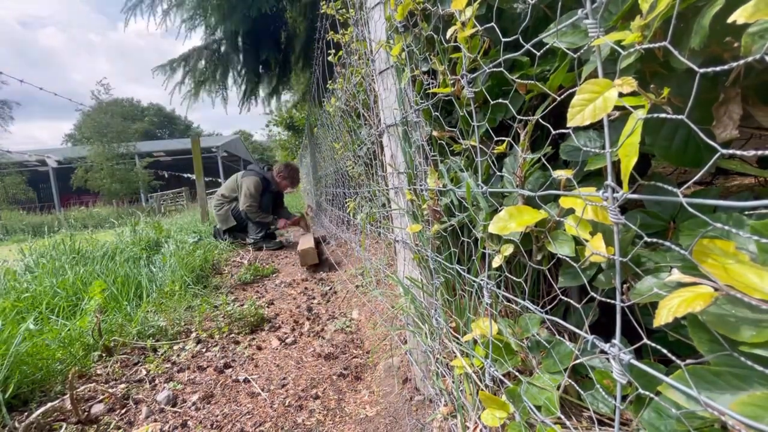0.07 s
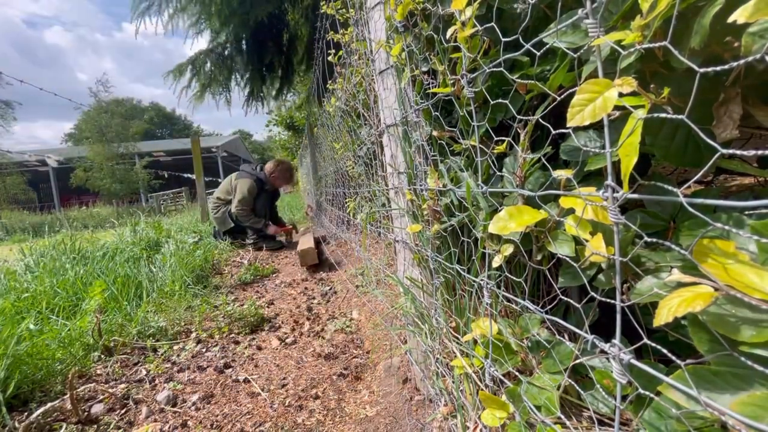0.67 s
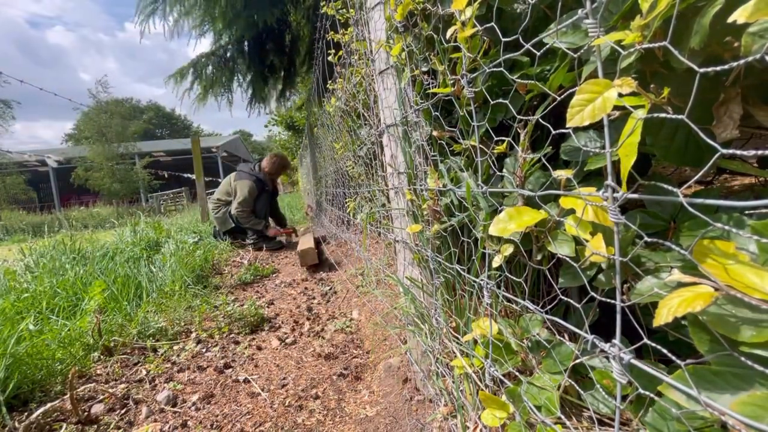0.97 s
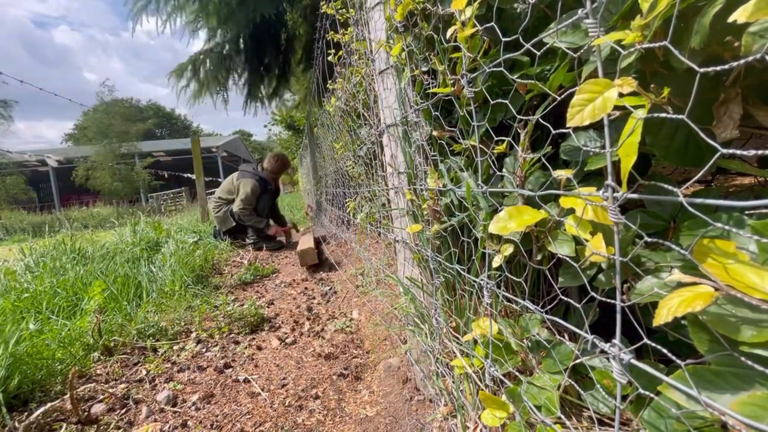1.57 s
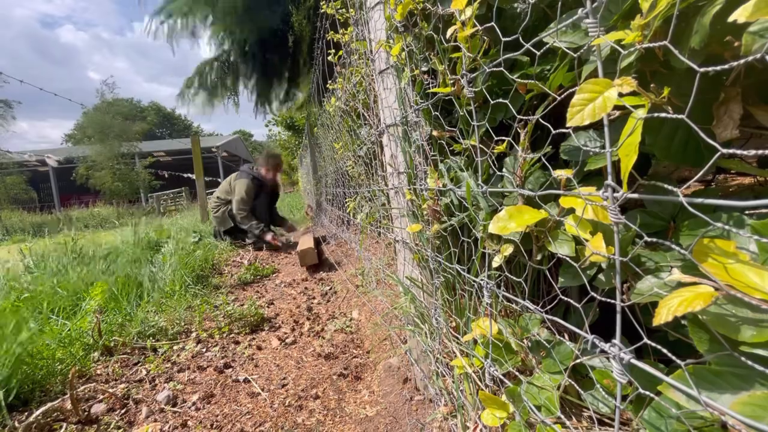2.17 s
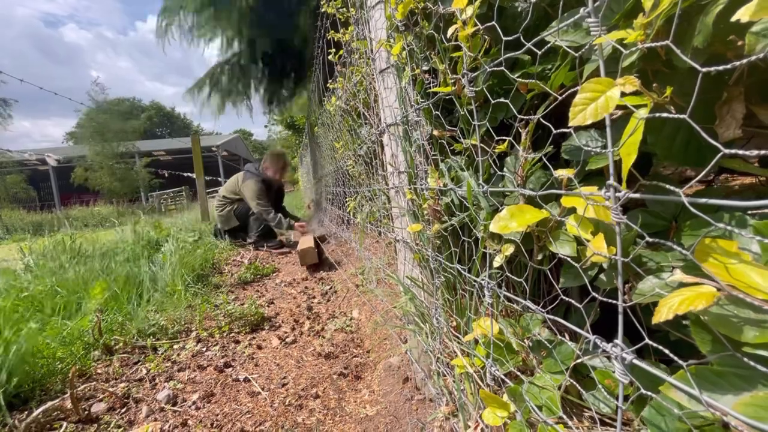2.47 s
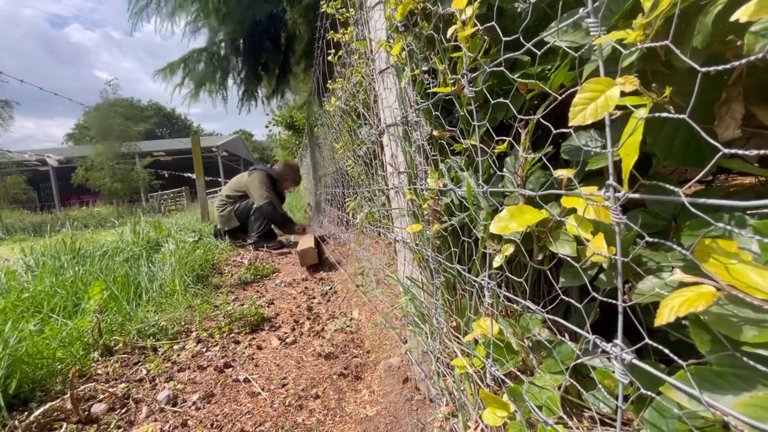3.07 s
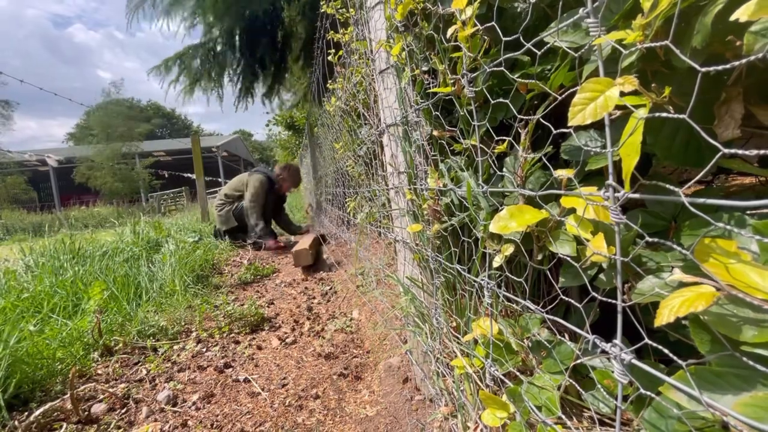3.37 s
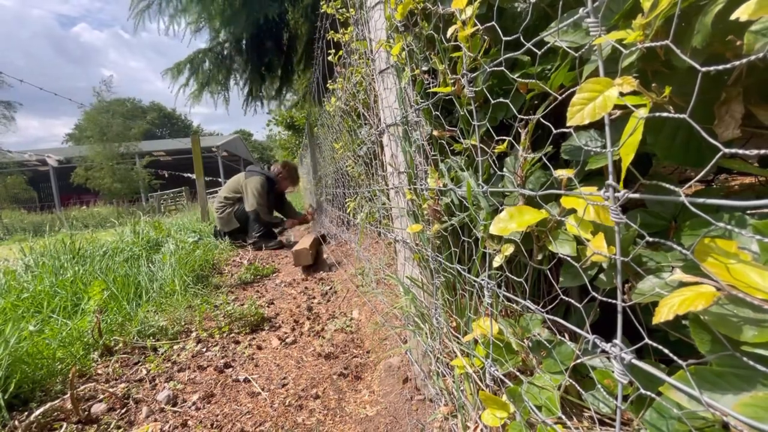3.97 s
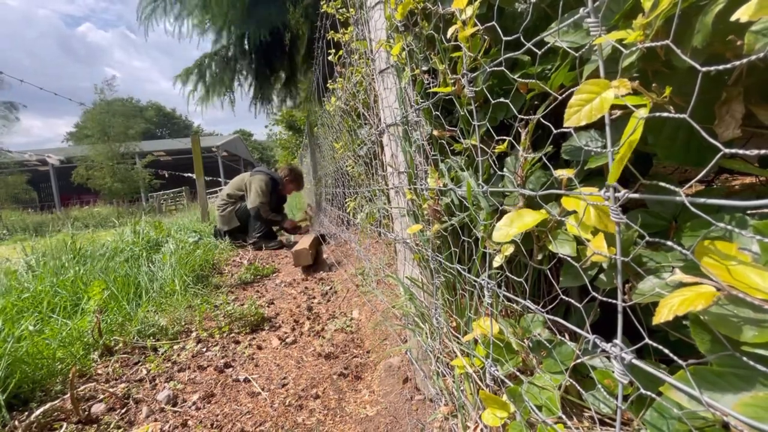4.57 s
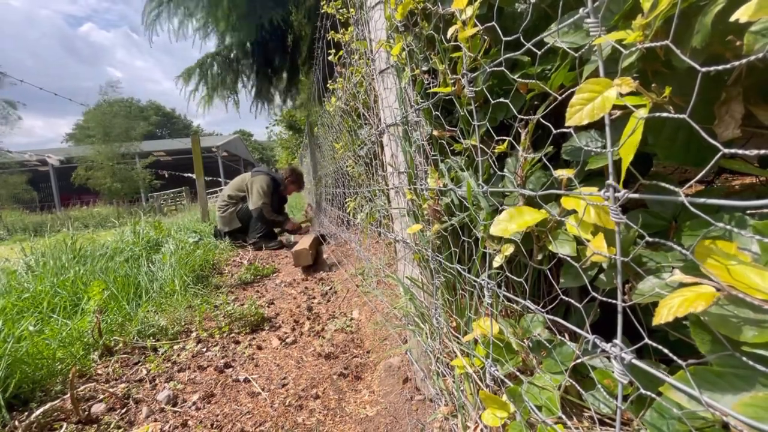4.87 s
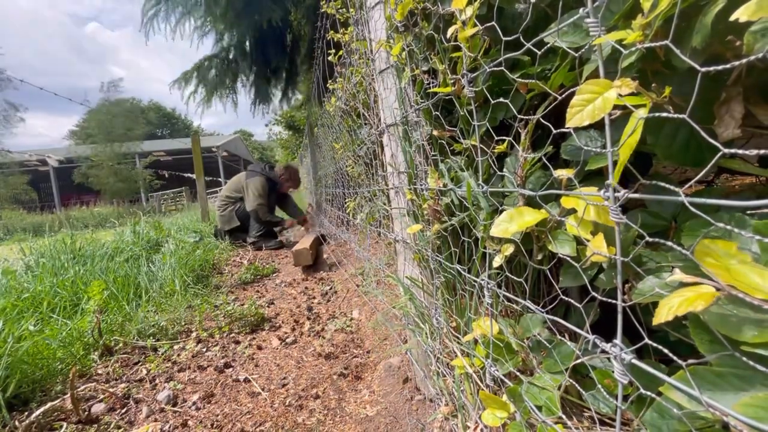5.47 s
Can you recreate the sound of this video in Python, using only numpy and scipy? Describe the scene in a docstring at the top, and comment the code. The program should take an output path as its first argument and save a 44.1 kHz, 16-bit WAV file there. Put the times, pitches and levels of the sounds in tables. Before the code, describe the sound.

Wire netting is being pulled tight on a fence outdoors, heard from right beside the wire. A few sharp metallic ticks and two small high squeaks come first, followed by a cluster of dull wooden knocks and light scuffs on soil from further away. Then the wire slips again in several short rattles that grow louder, all over a quiet rush of open air.

```python
"""A garden fence, its wire netting pulled tight. Close by, a taut wire sticks and slips on its post:
single ticks and swelling rattles with a brief steel ring, and short squeaks and a creak where the
slips merge into a tone. A hedge answers faintly and a leaf brushes the mesh. Further along, timber
and netting are knocked and dragged on the soil, over a soft outdoor rush and a thin hiss."""
import sys
import numpy as np
from scipy import signal
from scipy.fft import rfft, irfft, next_fast_len
from scipy.io import wavfile
from scipy.ndimage import map_coordinates

SR = 44100
rng = np.random.default_rng(int(sys.argv[2]) if len(sys.argv) > 2 else 0)


def wav_out(sig):
    """Save sig, one row per channel (or a flat mono array), as 16-bit PCM at SR to the path in sys.argv[1]."""
    wavfile.write(sys.argv[1], SR, np.round(np.clip(np.atleast_2d(sig).T, -1, 1) * 32767).astype(np.int16))


N = 252693


def amp(db):
    """Decibels to gain."""
    return 10 ** (np.asarray(db) / 20)


def unit(x):
    """x at rms 1."""
    return x / np.sqrt(np.mean(x ** 2) + 1e-20)


def along(points, hz):
    """Interpolate (f/Hz, value) points on a log axis."""
    f, v = np.transpose(points)
    return np.interp(np.log(hz + 1), np.log(f + 1), v)


def envelope(points):
    """Gain curve through (t/s, level/dB) points."""
    return amp(np.interp(np.arange(N) / SR, *np.transpose(points)))


def wobble(rate_hz, count=N):
    """Smooth random curve with knots at rate_hz."""
    knots = rng.standard_normal(int(count * rate_hz / SR) + 4)
    return map_coordinates(knots, [np.arange(count) * rate_hz / SR])


def filtered(x, response):
    """Apply a frequency response to x."""
    n = x.shape[-1]
    m = next_fast_len(n + 8192)
    return irfft(rfft(x, m) * response(np.fft.rfftfreq(m, 1 / SR)), m)[..., :n]


def noise(spectrum, correlation, count=N):
    """Stereo noise, rms 1, of given spectrum and L-R correlation."""
    def response(hz):
        angle = np.arccos(np.clip(along(correlation, hz), -1, 1)) / 2
        return amp(along(spectrum, hz)) * [np.cos(angle), np.sin(angle)]
    mid, side = filtered(rng.standard_normal((2, count)), response)
    return unit(np.array([mid + side, mid - side]))


def pan(db):
    """Stereo gains for an L-R level difference."""
    return amp(db * np.array([[.5], [-.5]]))


def left_lead(rad):
    """Stereo phasors for an L-R phase difference."""
    return np.exp(1j * rad * np.array([[.5], [-.5]]))


def add(out, start_s, x):
    """Mix x into out from start_s."""
    part = out[:, max(round(start_s * SR), 0):][:, :x.shape[-1]]
    part += x[..., :part.shape[1]]


# fence body modes: f/Hz, width/Hz, level/dB
FENCE_MODES = [(422, 25, -8), (603, 13.3, -49), (723, 20, -7.5), (816, 13, 3.5), (890, 84, -23),
               (1100, 33, -2), (1267, 37, 4), (1420, 61, 4.5), (2020, 55, -35)]


def fence(x, ring_db):
    """Posts and netting resonate with what shakes them; output at rms 1."""
    def body(f):
        return sum(amp(db) * 1j * f * width / (hz * hz - f * f + 1j * f * width)
                   for hz, width, db in FENCE_MODES)
    return unit(filtered(x, lambda f: 1 + amp(ring_db) * body(f)))


# rush envelope: t/s, level/dB
RUSH_ENVELOPE = [(0.0, -54.5), (0.88, -55.5), (1.12, -55), (1.24, -47.5), (1.39, -54.5), (2.11, -54.5),
                 (2.3, -51.5), (2.62, -59.5), (2.74, -56.5), (2.97, -54.5), (4.08, -56), (4.26, -57),
                 (4.48, -57), (4.88, -53.5), (5.23, -57.5), (5.73, -56)]
# rush spectrum: f/Hz, level/dB
RUSH_SPECTRUM = [(24, -75), (40, -62), (119, -38.5), (232, -16), (352, -6), (412, -3), (522, 1), (565, 0),
                 (745, -5), (890, -4.5), (1110, -10), (1430, -18), (1580, -13), (2390, -20.5), (4500, -24),
                 (5850, -27), (9900, -120)]
# stereo image of rush and hiss: f/Hz, L-R correlation
AIR_CORRELATION = [(60, -0.33), (110, -0.45), (200, -0.12), (380, -0.025), (700, 0.82), (1290, 0.76),
                   (2380, 0.64), (4400, -0.072), (8120, -0.14), (15000, 0.61)]


def rush(gain_db=2.0, flutter_db=1.91):
    """A low rush swells as the netting is handled."""
    gain = envelope(RUSH_ENVELOPE) * amp(gain_db + flutter_db * wobble(70))
    return pan(-0.053) * gain * fence(noise(RUSH_SPECTRUM, AIR_CORRELATION), ring_db=-2.0)


# hiss envelope: t/s, level/dB
HISS_ENVELOPE = [(0.0, -59.5), (1.45, -57.5), (4.64, -60), (4.79, -59.5), (5.03, -61), (5.73, -58.5)]
# hiss spectrum: f/Hz, level/dB
HISS_SPECTRUM = [(1470, -20.5), (2500, -3), (2710, -4), (3890, -6.5), (4310, -10), (5170, -3), (6650, 1),
                 (8430, 1.5), (9350, -3), (10600, 0), (15500, -14), (16100, -36), (16500, -43)]


def hiss():
    """A thin hiss drifts in level."""
    return envelope(HISS_ENVELOPE) * noise(HISS_SPECTRUM, AIR_CORRELATION)


# pulls on the wire: first t/s, last t/s, slips, gap growth/s, first level/dB, last level/dB,
# build-up/slips, treble/dB, post knock/dB
WIRE_PULLS = [(0.037, 0.0368, 1, 0, -39.5, -39, 1, -13, -4.5),
              (0.265, 0.3412, 2, 0, -25.5, -15.5, 1, -15.5, -10.5),
              (1.1781, 1.2501, 2, 0, -14.5, -18, 1, -16.5, -15), (1.950, 2.075, 4, 0, -57, -51, 3, -8, -1),
              (3.586, 3.7718, 5, 0.00035, -43, -25.5, 1.76, -8.5, -21),
              (4.0552, 4.0552, 1, 0, -34, -35.5, 1, -3, -30), (4.2081, 4.2536, 2, 0, -26, -24, 1, -11, -22),
              (4.6043, 4.9667, 9, 0.00053, -27.5, -17, 3.5, -10, -24.5),
              (5.3429, 5.5093, 4, 0.0063, -29, -14.5, 0.44, -6, -21.5),
              (5.570, 5.570, 1, 0, -20.5, -18, 1, -2, -19)]


def slip_train():
    """Yield each slip; as tension builds, a pull moves from its first level to its last."""
    for first_s, last_s, count, growth_s, first_db, last_db, build, treble_db, post_db in WIRE_PULLS:
        k = np.arange(count)
        times = np.linspace(first_s, last_s, count) - growth_s * k * k[::-1] / 2
        tension = 1 - np.exp(-k / build)
        levels = first_db + (last_db - first_db) * tension / max(tension[-1], 1e-9)
        for start_s, db in zip(times, levels):
            yield start_s, db, treble_db, post_db


# modes of the wire on its post: f/Hz, level/dB, t60/s, L-R/dB
WIRE_MODES = [(1370, 0.5, 0.028, 0), (2320, -23.5, 0.0023, 2.5), (3266, -9, 0.012, -2.5),
              (3350, -40, 0.11, 5), (3487, -1.5, 0.018, 7), (3860, -1.5, 0.0026, 7),
              (4330, -18, 0.0083, -5), (5480, -8, 0.011, -5), (5780, -1, 0.017, 7), (5995, -9, 0.025, 2),
              (8740, -10, 0.023, 7), (11220, -16.5, 0.066, -6), (12080, -15, 0.025, -2),
              (12600, -24, 0.0064, 2), (12630, -13, 0.0071, 2), (13500, -7.5, 0.018, -3)]


def wire_ring(t, emphasis, attack_s=0.00078, detune=0.0031, scatter_db=-13, scatter_t60_s=0.019):
    """The wire's modes ring down; nearby leaves and soil scatter the tick."""
    ring = np.zeros((2, len(t)))
    for hz, db, t60_s, side_db in WIRE_MODES:
        onset = 1 - np.exp(-(t * np.sqrt(hz / 3500) / attack_s) ** 2)  # short bending waves come first
        cycles = rng.random() + rng.normal(0, (hz / 26000) ** 2, (2, 1))  # L and R part in the treble
        wave = np.sin(2 * np.pi * (hz * (1 + detune * rng.normal()) * t + cycles))
        decay = amp(db + along(emphasis, hz) + rng.normal() - 60 * t / t60_s)
        ring += pan(side_db) * decay * onset * wave
    scatter = rng.standard_normal(len(t)) * amp(-60 * t / scatter_t60_s) * (t > .001)
    scatter /= np.linalg.norm(scatter)
    return ring + amp(scatter_db) * signal.fftconvolve(ring, scatter[None], axes=1)[:, :len(t)]


# snap spectrum: f/Hz, level/dB
SNAP_SPECTRUM = [(150, -45), (350, 8), (600, 17), (1400, 17), (1900, 1.5), (2700, 1), (3300, 3),
                 (4200, 2.5), (4800, -8), (6200, 5), (7300, -3), (9500, 4), (11500, 12.5), (15500, 2)]


def wire_snap(t, emphasis, rise_s=0.00031, t60_s=0.022):
    """The release: a noise burst with the brightness and direction of the ring."""
    sides = [(hz, side_db) for hz, _, _, side_db in WIRE_MODES]
    snap = noise(SNAP_SPECTRUM, [(1000, 0.9), (3500, 1.0), (6000, 0.66), (10000, 0.18)], len(t))
    snap = filtered(snap, lambda f: amp(along(emphasis, f)) * pan(along(sides, f)))
    return snap * amp(-60 * t / t60_s) * (1 - np.exp(-t / rise_s))


def slips(ring_db=4.5, snap_db=2, top_db=-6):
    """Each slip snaps and rings the wire, coloured by its pull."""
    out, t = np.zeros((2, N)), np.arange(SR // 16) / SR
    for start_s, db, treble_db, post_db in slip_train():
        emphasis = [(1500, post_db), (2300, 0), (4300, 0),
                    (5300, treble_db), (8800, treble_db), (10500, treble_db + top_db)]
        tick = amp(ring_db) * wire_ring(t, emphasis) + amp(snap_db) * wire_snap(t, emphasis)
        add(out, start_s - .0006, amp(db) * tick)
    return filtered(out, lambda f: amp(along([(100, -1), (400, 0)], f)))  # the slips carry a little less bass


# hedge echo decay: f/Hz, t60/s
HEDGE_DECAY = [(300, .15), (3500, 0.04), (12000, .05)]


def hedge(x):
    """Hedge and trees return a short, diffuse tail."""
    hz, t, bands = signal.stft(rng.standard_normal((2, SR // 3)), SR, nperseg=256)
    decay = amp(-60 * t / along(HEDGE_DECAY, hz)[:, None])
    _, tail = signal.istft(bands * decay, SR, nperseg=256)
    return signal.fftconvolve(x, tail / np.linalg.norm(tail[0]), axes=1)[:, :N]


# leaf on mesh: f/Hz, level/dB
LEAF_SPECTRUM = [(3500, -40), (4400, 4), (5500, 7), (7500, -10), (12000, -12), (15000, -13)]


def leaf_brush(centre_s=.745, half_s=0.0088, db=-57):
    """A leaf brushes lightly over the mesh."""
    swell = np.exp(-((np.arange(N) / SR - centre_s) / half_s) ** 2)
    return amp(db) * swell * noise(LEAF_SPECTRUM, [(5000, 0.78)])


def friction_tone(start_s, length_s, pitch_hz, level, harmonics, jitter, flutter_db):
    """Rapid slips merge into a tone; pitch_hz and level are functions of progress u, 0 to 1."""
    u = np.clip((np.arange(N) / SR - start_s) / length_s, 0, 1)
    phase = 2 * np.pi * np.cumsum(pitch_hz(u) * (1 + jitter * wobble(700))) / SR
    gate = np.clip(np.minimum(u, 1 - u) * length_s / 0.001, 0, 1)
    gain = gate * level(u) * amp(flutter_db * wobble(250))
    return np.sqrt(2) * gain * sum(amp(db) * np.sin(k * phase) for k, db in harmonics)


# wire squeaks: t/s, length/s, settled f/Hz, level/dB
WIRE_SQUEAKS = [(1.012, .056, 2820, -40.5), (1.575, .070, 3236, -40)]
# squeak timbre: harmonic, level/dB
SQUEAK_HARMONICS = [(1, 0.5), (2, -24.5), (3, -31), (4, -23), (5, -29)]


def squeaks():
    """The sliding wire sings: pitch leaps as it breaks free and sags as it sticks again."""
    def glide(u):
        overshoot = 0.2 * np.exp(-((u - 0.19) / 0.2) ** 2)
        stall = 0.11 * np.exp((u - 1) / 0.03)
        return 1 + overshoot - stall
    return pan(1.2) * sum(friction_tone(start_s, length_s, lambda u: hz * glide(u), lambda u: amp(db),
                                        SQUEAK_HARMONICS, jitter=.004, flutter_db=.4)
                          for start_s, length_s, hz, db in WIRE_SQUEAKS)


# timber and netting spectrum: f/Hz, level/dB
TIMBER_SPECTRUM = [(40, -48), (100, -49), (160, -34.5), (250, -20.5), (340, -5), (450, 2.5), (650, 2.5),
                   (850, 0), (1400, -14.5), (2200, -27.5), (3500, -41), (5000, -44), (7000, -81)]
# grit spectrum: f/Hz, level/dB
GRIT_SPECTRUM = [(300, -20), (800, 22), (1400, 16), (2000, 10.5), (3300, 1.5), (5000, -16), (7000, -50),
                 (10000, -70)]
# drags over soil: centre t/s, half length/s, level/dB, grit/dB
SOIL_SCUFFS = [(1.12, 0.057, -42, -30), (2.084, 0.019, -43, -14), (2.225, 0.025, -36, -13),
               (2.96, 0.094, -46.5, -26), (4.001, 0.03, -49.5, -24), (4.269, 0.019, -50, -1.5),
               (5.03, 0.09, -55.5, -16), (5.253, .025, -50, -5)]


def scuffs(lump_db=4.0, lump_hz=110):
    """Netting and timber drag over the soil: a lumpy swell with some grit."""
    out, t = np.zeros((2, N)), np.arange(SR // 3) / SR
    t -= t.mean()
    for centre_s, half_s, db, grit_db in SOIL_SCUFFS:
        swell = np.exp(-(t / half_s) ** 2) * unit(amp(lump_db * wobble(lump_hz, len(t))))
        drag = noise(TIMBER_SPECTRUM, [(500, 0.13)], len(t))
        drag = unit(filtered(drag, lambda f: amp(along([(250, 10.5), (800, -4.5)], f))))
        grit = amp(grit_db) * noise(GRIT_SPECTRUM, [(2000, 0.1)], len(t))
        add(out, centre_s + t[0], amp(db) * swell * (drag + grit))
    return out


# knocks on timber: t/s, level/dB, tilt/(dB/octave), grit/dB
TIMBER_KNOCKS = [(1.372, -22.5, -1.5, -42), (2.2405, -14, 9, -9.5), (2.2452, -11, -5, -34),
                 (2.2502, -16.5, 10.5, -7), (2.357, -29, 3, -14), (2.3996, -22.5, 10.5, -7),
                 (2.4064, -17.5, 7, -25), (2.471, -30.5, -8, -14.5), (2.9205, -21, -0.5, -37),
                 (4.049, -26.5, -8.5, -40), (5.015, -23.5, 4.5, -47), (5.238, -29, 1, -12)]


def knocks(thud_db=0.06, rustle_db=-20.5, rustle_per_tilt=-0.33, right_lag_s=0.00033):
    """Short, dead pushes on timber; netting rustles around each and grit scrapes under it."""
    out, t = np.zeros((2, N)), (np.arange(SR // 3) - SR // 16) / SR
    impulse = 1. * (t == 0)

    def burst(rise_s, t60_s):
        return np.exp(np.minimum(t, 0) / rise_s) * amp(-60 * np.maximum(t, 0) / t60_s)

    for peak_s, db, tilt, grit_db in TIMBER_KNOCKS:
        def timber(f):
            octaves = np.log2(np.clip(f, 300, 6000) / 500)
            gain = amp(along(TIMBER_SPECTRUM, f) + tilt * octaves)
            return gain * left_lead(2 * np.pi * f * right_lag_s)
        thud = filtered(impulse, timber)
        thud *= amp(thud_db) / np.abs(thud).max()
        rustle = burst(rise_s=0.014, t60_s=0.16) * noise(TIMBER_SPECTRUM, [(500, 0.022)], len(t))
        rustle *= amp(rustle_db + rustle_per_tilt * tilt)
        grit = burst(rise_s=0.0021, t60_s=0.064) * noise(GRIT_SPECTRUM, [(2000, 0.052)], len(t))
        add(out, peak_s + t[0], amp(db) * (pan(-2.0) * (thud + amp(grit_db) * grit) + rustle))
    return out


# creak timbre: harmonic, level/dB
CREAK_HARMONICS = [(1, -5.5), (2, 0), (3, -9), (4, -14), (5, -26)]


def creak(start_s=1.85, length_s=.05, first_hz=1510, last_hz=792, db=-48):
    """The sliding wire creaks, low and rough, sagging in pitch as it dies."""
    sag = lambda u: first_hz * (last_hz / first_hz) ** u
    swell = lambda u: amp(db) * np.sin(np.pi * u ** 0.78)
    tone = friction_tone(start_s, length_s, sag, swell, CREAK_HARMONICS, jitter=.04, flutter_db=2.2)
    return pan(2.2) * tone


# direction of the wire: f/Hz, left phase lead/rad
WIRE_PHASE = [(200, -2.5), (2000, 0.22), (3400, 0.77), (4200, 0.46), (6000, -0.21), (12000, -1.35)]


def scene(hedge_db=-16):
    """Open air, the near wire with its echo, a leaf, and scuffs and knocks further off."""
    wire = filtered(slips() + squeaks() + creak(), lambda f: left_lead(along(WIRE_PHASE, f)))
    return rush() + hiss() + wire + amp(hedge_db) * hedge(wire) + leaf_brush() + scuffs() + knocks()


def record(dry, cutoff_hz=16100):
    """Steep low-pass."""
    return filtered(dry, lambda hz: 1 / np.sqrt(1 + (hz / cutoff_hz) ** 160))


dry = scene()
out = record(dry)
wav_out(out)
```